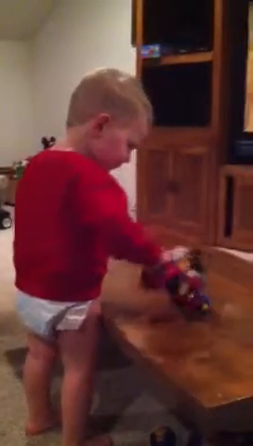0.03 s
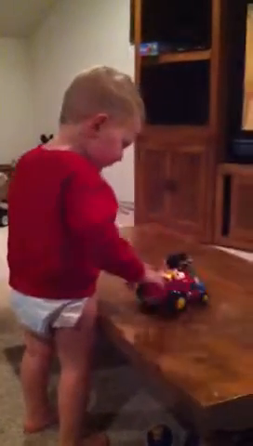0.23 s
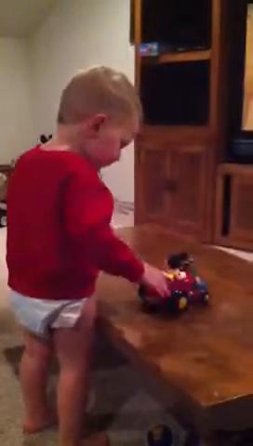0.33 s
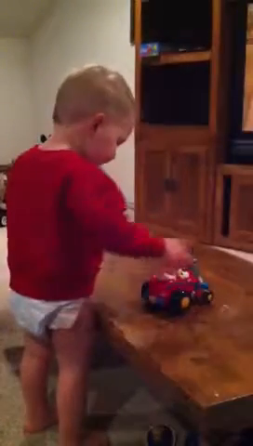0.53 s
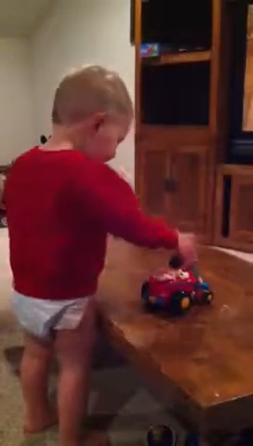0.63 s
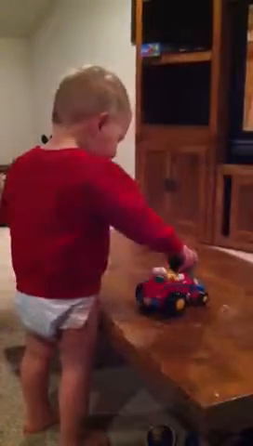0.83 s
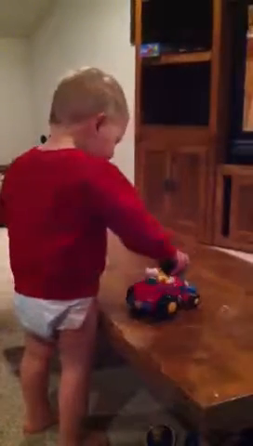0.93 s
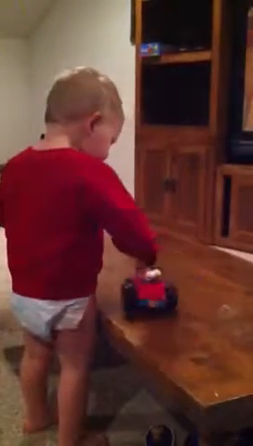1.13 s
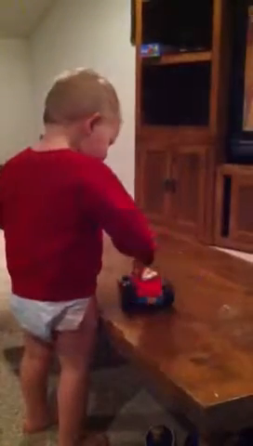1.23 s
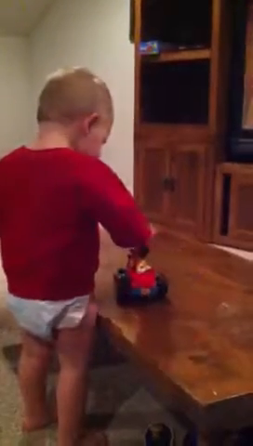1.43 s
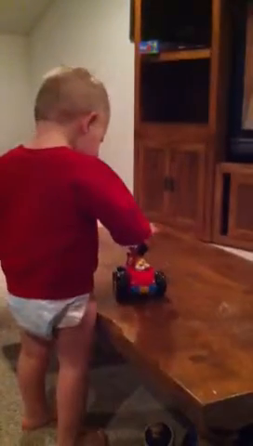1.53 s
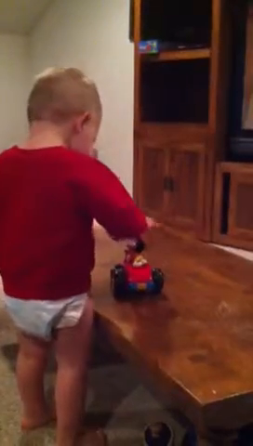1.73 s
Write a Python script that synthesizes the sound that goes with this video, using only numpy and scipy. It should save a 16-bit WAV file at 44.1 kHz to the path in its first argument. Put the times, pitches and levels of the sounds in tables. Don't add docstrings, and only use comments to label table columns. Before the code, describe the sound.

Toy car clatters down hard on a wooden tabletop, rattles briefly, then is quietly touched and turned

```python
import sys
import numpy as np
from scipy import signal
from scipy.fft import rfft, irfft
from scipy.io import wavfile

SR = 44100
rng = np.random.default_rng(int(sys.argv[2]) if len(sys.argv) > 2 else 0)


def transcribe(signal):
    frames = np.atleast_2d(signal).T
    limited = np.clip(frames, -1, 1)
    pcm = np.round(limited * 32767).astype(np.int16)
    wavfile.write(sys.argv[1], SR, pcm)


def elevation(decibels):
    levels = np.asarray(decibels, float)
    return 10 ** (levels / 20)


N = 79380

SHELL_MODES_HZ = [470, 660, 805, 917, 1037, 1268, 1498, 1830, 1930, 2276]
# level_db, t60_s
SHELL_DECAYS = [(-10, .04), (-11.5, .05), (-12, .04), (-21.5, 0.036), (-1.5, 0.064), (-5.5, 0.033),
                (-2.5, .06), (-4.5, 0.018), (-1.5, 0.027), (-3.5, 0.013)]


def unit(x):
    return x / np.sqrt(np.mean(x ** 2) + 1e-20)


def band(x, lo_hz, hi_hz=None):
    edge, kind = ([lo_hz, hi_hz], "band") if hi_hz else (lo_hz, "high")
    return signal.sosfilt(signal.butter(2, edge, kind, fs=SR, output="sos"), x)


def ring(x, hz, t60_s):
    r = elevation(-60 / (t60_s * SR))
    w = 2 * np.pi * hz / SR
    return signal.lfilter([0, np.sin(w)], [1, -2 * r * np.cos(w), r * r], x + 1e-18)


def coloured(x, points):
    hz, db = np.transpose(points)
    f = np.maximum(np.arange(len(x) // 2 + 1) * SR / len(x), 1)
    gain = elevation(np.interp(np.log(f), np.log(hz), db))
    return unit(irfft(rfft(x) * gain, len(x)))


def drift(rate_hz):
    r = np.exp(-2 * np.pi * rate_hz / SR)
    wander = signal.lfilter([1], [1, -2 * r, r * r], rng.standard_normal(N + 8000))
    return unit(wander[8000:])


def add(out, start_s, x):
    i = int(start_s * SR)
    out[i:i + len(x)] += x[:N - i]


def contact():
    contact_s = .0024
    t = np.arange(512) / SR
    shape = t * np.exp(-t / (contact_s / 2))
    x = rng.standard_normal(len(t))
    for _ in range(3):
        spectrum = rfft(x * shape)
        x = irfft(spectrum / np.abs(spectrum))
    return np.pad(x, (0, 6000 - len(t)))


def hush():
    rumble_db, hush_db = -100, -69
    # hz, level_db_per_hz
    hush_colour = [(70, -26.5), (110, -9.5), (160, 1), (230, 0.5), (330, -10.5), (1050, -9.5),
                   (2500, -20.5), (16000, -24.5)]
    rumble = elevation(rumble_db) * unit(band(rng.standard_normal(N), 15., 52.0))
    return rumble + elevation(hush_db) * coloured(rng.standard_normal(N), hush_colour)


def room(x):
    t60_s, high_t60_s, tail_start_s, tail_db = 0.34, 0.25, .006, -4.5
    first_echo_s, first_echo_db = .0072, -6
    # delay_s, level_db
    echoes = [(.0145, -8.5), (.0205, -11), (.028, -18.5)]
    t = np.arange(SR) / SR
    noise = rng.standard_normal(SR)
    high = band(noise, 3600.0)
    tail = (noise - high) * elevation(-60 * t / t60_s) + high * elevation(-60 * t / high_t60_s)
    tail = tail * np.clip((t - tail_start_s) / 0.0023, 0, 1)
    tail = elevation(tail_db) * band(tail / np.sqrt(np.sum(tail ** 2)), 450.)
    for delay_s, db in echoes + [(first_echo_s, first_echo_db)]:
        add(tail, delay_s, elevation(db) * contact())
    return x + signal.fftconvolve(x, tail)[:N]


def table():
    swell_s, hollow_hz, hollow_t60_s = .012, 380, 0.28
    # start_s, level_db, hollow_share_db
    thumps = [
        (0.208, -36, -26),
        (0.286, -50, 4.5),
        (0.852, -69.5, -8),
        (1.055, -66, -32),
        (1.291, -57.5, -26),
        (1.349, -60, -25),
        (1.401, -61.5, -22),
        (1.485, -60, -23.5),
        (1.638, -64.5, -7),
    ]
    # hz, level_db, t60_s
    table_modes = [(156.9, 7, 0.27), (208, -26.5, 0.07)]
    push, hollow = np.zeros((2, N))
    for start_s, db, share_db in thumps:
        i = int(start_s * SR)
        push[i] = elevation(db)
        hollow[i] = elevation(db + share_db)
    boom = np.zeros(N)
    for hz, db, t60_s in table_modes:
        swell = ring(push, hz, swell_s * 7) * 2 / (SR * swell_s)
        boom += elevation(db) * ring(swell, hz, t60_s)
    hollow_swell = ring(hollow, hollow_hz, 0.064) / 200.0
    return boom + ring(hollow_swell, hollow_hz, hollow_t60_s)


def rubbing():
    grains_per_s, grain_spread_db = 2500, 2.2
    # time_s, level_db
    rub_level = [(0, -53), (.1, -62.5), (.14, -52.5), (.16, -52.5), (.17, -51), (.198, -57.5), (0.214, -36),
                 (0.301, -37), (.4, -67.5), (0.552, -82), (1.062, -77), (1.131, -62), (1.221, -67),
                 (1.245, -73.5), (1.3, -71.5), (1.45, -67.5), (1.551, -82), (1.8, -86)]
    # hz, level_db_per_hz
    rub_colour = [(300, -18.5), (460, -11), (900, -1.5), (1500, 0.5), (2300, -3.5), (4000, -5),
                  (6200, -14.5), (14000, -20.5)]
    time_s, db = np.transpose(rub_level)
    grains = (rng.random(N) < grains_per_s / SR) * rng.standard_normal(N)
    grains = grains * elevation(grain_spread_db * np.minimum(rng.exponential(1, N), 3))
    modes = np.zeros(N)
    for hz, (mode_db, t60_s) in zip(SHELL_MODES_HZ, SHELL_DECAYS):
        modes += elevation(mode_db) * ring(grains, hz, t60_s) / np.sqrt(t60_s)
    mix = coloured(grains, rub_colour) + 0.15 * unit(modes)
    return elevation(np.interp(np.arange(N) / SR, time_s, db) + 1.5 * drift(30)) * mix


def squeak():
    start_s, end_s, pitch_hz, level_db, wobble = 1.085, 1.235, 2055, -81.5, 0.0085
    # multiple, level_db
    partials = [(1, 0), (2, 2), (2.6, -6), (2.9, -5), (2.96, -4), (3.04, -4), (4, -9)]
    t = np.arange(N) / SR
    phase = 2 * np.pi * np.cumsum(pitch_hz * (1 + wobble * drift(150))) / SR
    on = np.clip(np.minimum(t - start_s, end_s - t) / 0.009, 0, 1)
    return on * sum(elevation(level_db + db + 5.3 * drift(40)) * np.sin(k * phase) for k, db in partials)


def skid():
    start_s, end_s, from_hz, to_hz = .166, .205, 1650, 1120
    level_db, rough_db, wobble = -46.5, 5, .05
    t = np.arange(N) / SR
    along = np.clip((t - start_s) / (end_s - start_s), 0, 1)
    hz = (from_hz + (to_hz - from_hz) * along ** .7) * (1 + wobble * drift(200))
    fade = np.clip(8.7 * np.minimum(along, 1 - along), 0, 1)
    tone = np.sin(2 * np.pi * np.cumsum(hz) / SR)
    return elevation(level_db + rough_db * drift(130)) * fade * tone


def taps():
    ring_cycles = 22
    # start_s, peak_db, ring_hz, ring_share_db
    touches = [(0.7805, -38.5, 1230, -4), (0.783, -50.5, 602, 2), (0.873, -61, 2260, 3),
               (1.01, -61, 1900, 6.5), (1.122, -44.5, 1487, -2), (1.13, -54, 453, 10),
               (1.167, -55, 880, 15), (1.259, -45.5, 1180, 3), (1.278, -49, 1270, 14.5),
               (1.29, -50.5, 770, 10), (1.387, -42, 2634, 6), (1.39, -47, 3370, 1), (1.403, -45.5, 1230, 7),
               (1.44, -53, 1260, 13), (1.488, -53, 1200, 14), (1.65, -54, 740, 2.5)]
    out = np.zeros(N)
    for start_s, db, hz, ring_db in touches:
        crumble = sum(elevation(-2.5 * k) * np.roll(contact(), 170 * k) for k in range(6))
        tone = 0.17 * elevation(ring_db) * ring(crumble, hz, ring_cycles / hz)
        knock = 2.5 * band(band(crumble, 550., 2370.0), 450., 3400.)
        add(out, start_s, elevation(db) * (tone + knock))
    return out


def ticks():
    crack_db, shell_db, treble_per_db, ring_t60_s = -1.5, -17, 0.4465, .0035
    rattle_db, rattle_per_s, rattle_t60_s = -14, 1800, .11
    # start_s, peak_db, ring_hz, body_share_db, ring_share_db
    hits = [(0.002, -47.5, 8200, 4, 5), (0.0483, -38, 6300, -4.5, -25), (0.1101, -42.5, 7170, -10, 12),
            (0.1645, -36.5, 2766, 4.5, 0.5), (0.205, -6, 6370, -4, 3), (0.2793, -19.5, 5600, -14, 3.5),
            (0.2964, -38, 8340, 5.5, 21), (0.3237, -27.5, 8330, -2, 6), (0.3324, -34, 13000, 7, 1),
            (0.4768, -36.5, 6630, -9.5, -10), (1.275, -55, 4000, 12, 8.5), (1.2964, -59.5, 3820, -28, 12),
            (1.3138, -57.5, 5670, -20, 10.5), (1.3518, -58.5, 5800, -15, 7), (1.3867, -44.5, 5940, -4, -30),
            (1.4648, -41, 7600, -4.5, 6), (1.5923, -54, 5380, 1, 3.5), (1.6886, -53.5, 5460, 0, -9)]
    # hz, level_db_per_hz
    crack_colour = [(400, -21), (1000, -16), (2300, 1), (4000, -7), (6000, -1.5), (8300, -3.5),
                    (9500, -12.5), (15500, -13.5)]
    out, t = np.zeros(N), np.arange(6000) / SR
    for start_s, db, ring_hz, body_db, ring_db in hits:
        jolts = contact()
        rattle = (rng.random(len(t)) < rattle_per_s / SR) * rng.standard_normal(len(t))
        jolts = jolts + rattle * elevation(rattle_db - 60 * t / rattle_t60_s)
        crack = coloured(jolts, crack_colour) * np.sqrt(np.sum(jolts ** 2) / len(t))
        crack = crack + (elevation(treble_per_db * (db + 14.5)) - 1) * band(crack, 6000.0)
        modes = np.zeros(len(t))
        for hz, (mode_db, t60_s) in zip(SHELL_MODES_HZ, SHELL_DECAYS):
            modes += elevation(mode_db + body_db + rng.normal(0, 1.4)) * ring(jolts, hz, t60_s)
        bright = 0.42 * elevation(ring_db) * ring(jolts, ring_hz, ring_t60_s)
        add(out, start_s, elevation(db) * (bright + 3.64 * elevation(crack_db) * crack + elevation(shell_db) * modes))
    return out


def scene():
    tyre = skid()
    on_table = ticks() + taps() + 0.51 * rubbing() + squeak() + .3 * tyre
    return (room(on_table) + 0.49 * tyre + table())[None]


def band_limit(x):
    return signal.sosfilt(signal.butter(12, 16620, fs=SR, output="sos"), x)


def record(dry):
    limit, low_hz, top_hz = .6, 123, 16300
    x = limit * np.tanh(dry / limit)
    for _ in range(3):
        x = band(x, low_hz)
    x = x + hush()
    x = signal.sosfilt(signal.cheby2(12, 60, top_hz, fs=SR, output="sos"), x)
    return band_limit(x)


dry = scene()
out = record(dry)
transcribe(out)
```